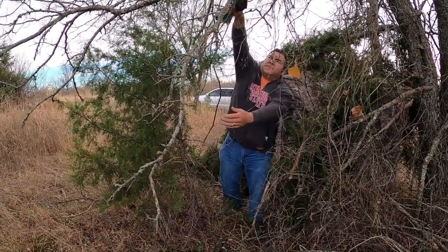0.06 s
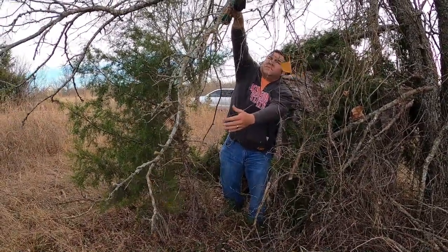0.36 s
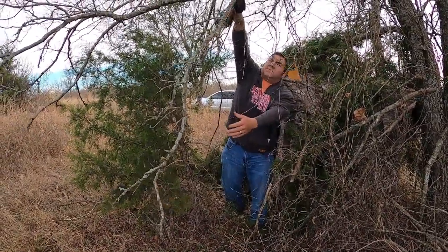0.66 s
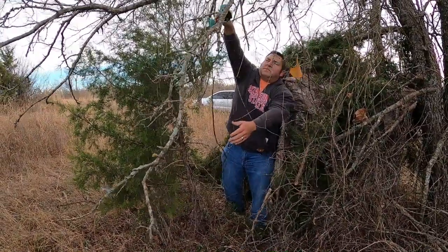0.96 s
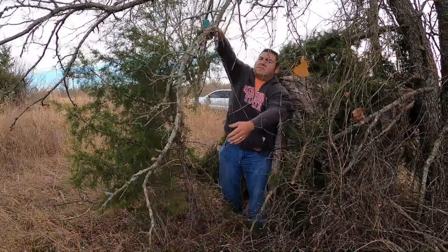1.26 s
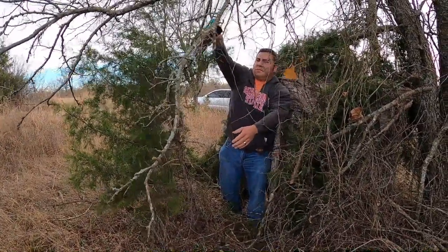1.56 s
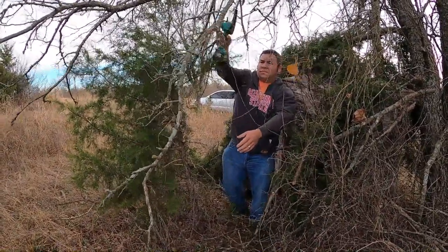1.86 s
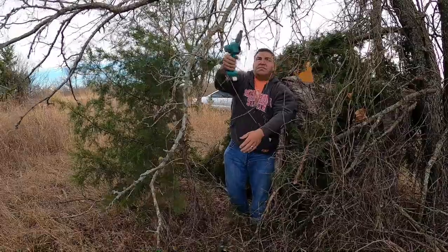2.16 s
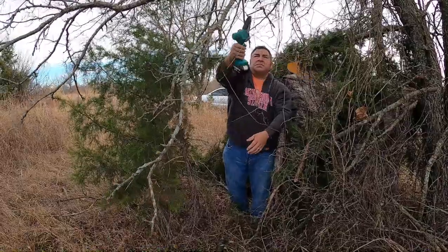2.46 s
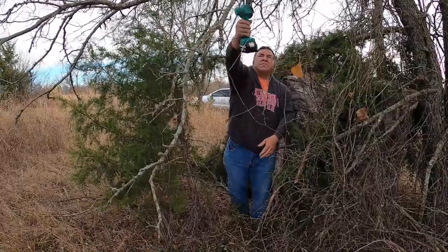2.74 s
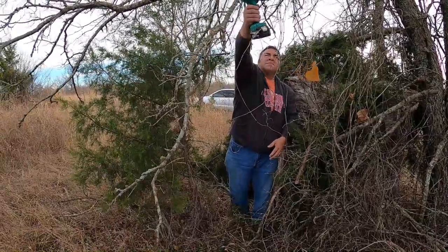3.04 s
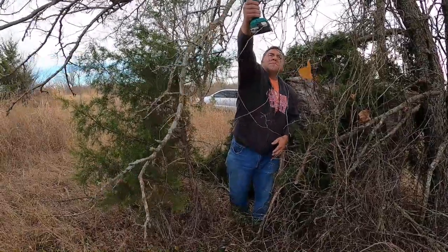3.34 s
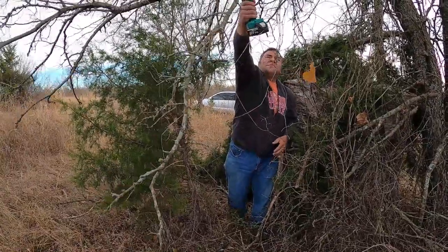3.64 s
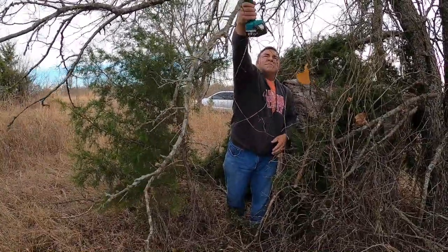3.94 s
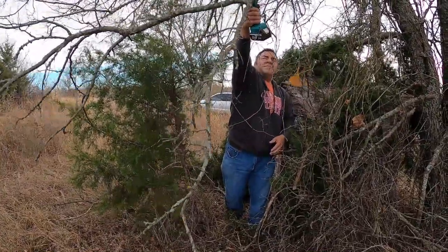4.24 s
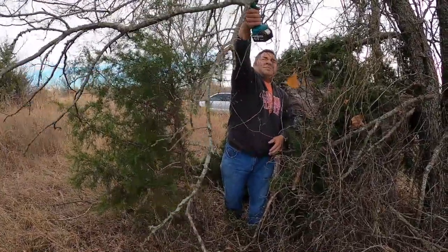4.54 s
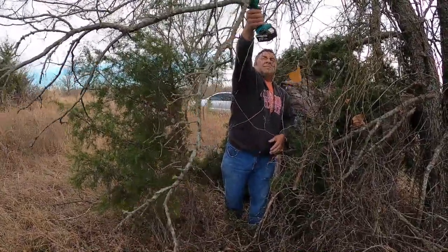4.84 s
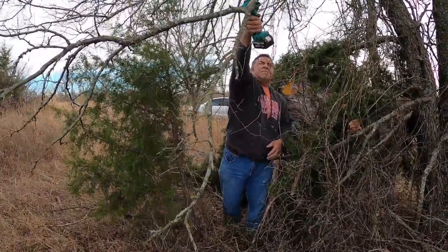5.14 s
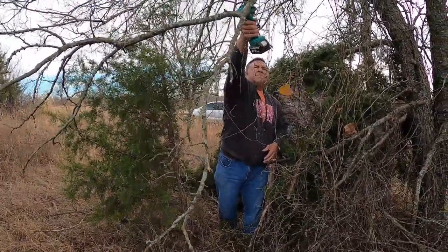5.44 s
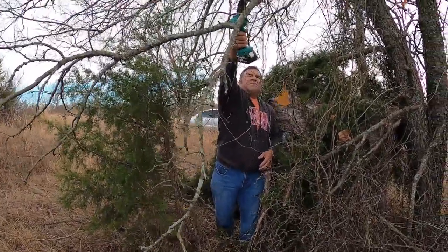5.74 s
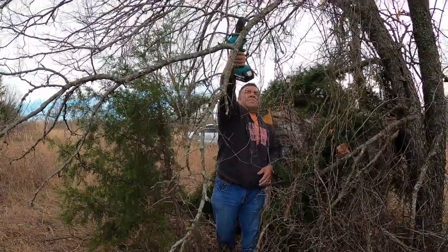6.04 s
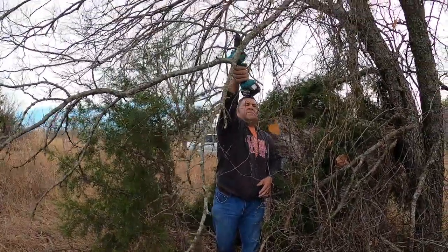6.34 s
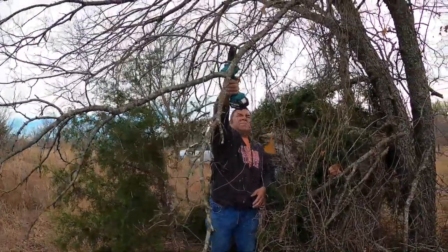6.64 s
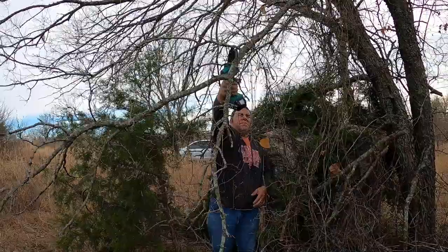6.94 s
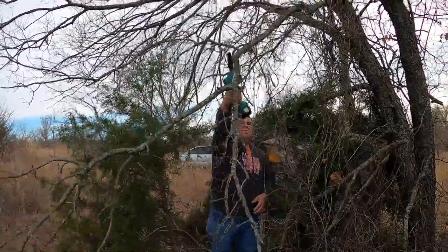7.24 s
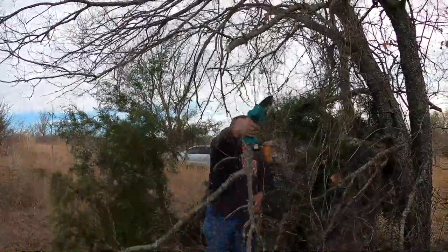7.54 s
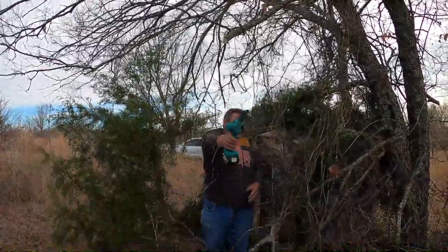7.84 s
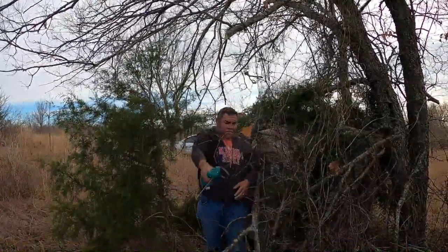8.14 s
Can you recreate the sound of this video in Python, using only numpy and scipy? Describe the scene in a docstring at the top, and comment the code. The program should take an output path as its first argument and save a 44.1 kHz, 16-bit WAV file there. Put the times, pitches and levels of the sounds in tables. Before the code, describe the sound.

A small cordless chainsaw chatters through a thin branch, coasts down, then grinds through a thick one until the wood cracks.

```python
"""Open brush, a far road behind; a few metres from the microphone a cordless mini chainsaw works overhead.
It chatters through a thin dry branch, the slack chain slapping the steel bar, and coasts to rest.
Twigs brush and snap as it is lifted again. At 4 s it bites a thick branch, jams briefly, then grinds
on, the gear whine sagging under load. The wood cracks and swishes down, and the saw coasts once more
as it is lowered towards the microphone."""
import sys
import numpy as np
from scipy import signal
from scipy.fft import rfft, irfft, next_fast_len
from scipy.io import wavfile
from scipy.ndimage import map_coordinates

SR = 44100
rng = np.random.default_rng(int(sys.argv[2]) if len(sys.argv) > 2 else 0)


def log_audio(samples):
    """Write samples as a 16-bit WAV file to the path given in sys.argv[1]."""
    # one column per channel
    frames = np.atleast_2d(samples).T
    # limit to full scale, then quantise
    limited = np.clip(frames, -1, 1)
    pcm = np.round(limited * 32767).astype(np.int16)
    wavfile.write(sys.argv[1], SR, pcm)


N = 361179

# The two cuts. Each row: trigger pulled, wood cut through and trigger released in seconds,
# base shaft speed in the wood in Hz, then base levels in dB of chain, bite, growl, whine and rasp.
CUTS = [(-.5, .785, 1.03, 346, -29.5, -29.5, -46.3, -40, -46),
        (3.978, 7.331, 7.46, 316.1, -28.7, -27.3, -51, -32, -34.7)]
# The chain binds and the motor bogs down. Each row: time in seconds, speed lost in Hz, half-width in seconds.
BOGS = [(.13, 14, .09), (.7, 16, .1), (4.228, 104, .021), (4.275, 62, .045), (4.97, 50, .07),
        (5.29, 22, .045), (5.48, 73, .055), (5.68, 24, .05), (5.93, 20, .04), (6.055, 104, .065),
        (6.18, 30, .05), (6.53, 22, .035), (6.79, 25, .06), (6.9, 27, .11)]
# The spectrum of a sharp impact. Each row: frequency in Hz, level in dB.
IMPACT_SPECTRUM = [(100, -33), (400, 0), (1000, -4.5), (2500, 2), (4000, 1), (6800, 2), (8000, 1.5),
                   (9500, -12.5), (13000, -8), (15700, -36)]
CUTTERS_PER_TURN = .5  # a cutter meets the wood every second turn of the shaft
JAM_AT_S = 4.232


def amp(db):
    return 10 ** (np.asarray(db) / 20)


def unit(x):
    return x / np.sqrt(np.mean(x ** 2) + 1e-20)


def clock():
    return np.arange(N) / SR


def since(s):
    """Seconds gone by since s, zero before it."""
    return np.maximum(clock() - s, 0)


def along(points, hz):
    """Read (Hz, value) points on a log frequency axis."""
    knots, values = np.transpose(points)
    return np.interp(np.log(hz + 1), np.log(knots + 1), values)


def envelope(start, end, attack_s, release_s):
    """Rises from start, holds, and dies away after end."""
    return (1 - np.exp(-since(start) / attack_s)) * np.exp(-since(end) / release_s)


def swells(rows):
    """Sum of peaks that build and die away, from (s, height, half-width s) rows."""
    return sum(height * np.exp(-np.abs(clock() - s) / width) for s, height, width in rows)


def hump(s, db, width_s):
    """A gain that swells smoothly to db at s and fades again."""
    return amp(db) * np.exp(-((clock() - s) / width_s) ** 2)


def wobble(rate):
    """A smooth random curve, rate knots a second."""
    return map_coordinates(rng.standard_normal(int(N * rate / SR) + 4), [np.arange(N) * rate / SR])


def grains(rate, spread_db):
    """Tiny impacts at random times and of scattered size; rms 1."""
    impacts = (rng.random(N) < rate / SR) * rng.standard_normal(N)
    return unit(impacts * amp(spread_db * rng.standard_normal(N)))


def strokes(turns, spread_db, decay):
    """One fading stroke of random force for each whole turn."""
    force = amp(spread_db * np.clip(rng.standard_normal(N), -2, 2))
    return unit(force[turns.astype(int)] * np.exp(-(turns % 1) / decay))


def filtered(x, response):
    """x times a complex response of frequency."""
    size = next_fast_len(N + SR // 4)
    return irfft(rfft(x, size) * response(np.fft.rfftfreq(size, 1 / SR)), size)[..., :N]


def coloured(x, gain_db, size=4096):
    """x through a causal filter whose gain in dB is a function of frequency."""
    cepstrum = irfft(np.log(amp(gain_db(np.fft.rfftfreq(size, 1 / SR))) + 1e-6))
    cepstrum[1:size // 2] *= 2
    cepstrum[size // 2 + 1:] = 0
    return signal.fftconvolve(x, irfft(np.exp(rfft(cepstrum))))[:len(x)]


def body(x, spectrum, modes=()):
    """x rings a body with this spectrum and these narrow resonances; rms 1."""
    lift = lambda hz: sum(db / (1 + ((hz - centre) / width) ** 2) for centre, width, db in modes)
    return unit(coloured(x, lambda hz: along(spectrum, hz) + lift(hz)))


def add_hit(track, s, db, hz, t60, slope_db, rise_s=.00079, colour=IMPACT_SPECTRUM, size=4096):
    """Add one impact: a dying burst of noise, its colour cut by slope_db an octave either side of hz."""
    t = np.arange(size) / SR
    fade = amp(-60 * t / max(t60, .002)) * (1 - np.exp(-t / rise_s))
    gain_db = lambda f: along(colour, f) - slope_db * np.abs(np.log2((f + 50) / hz))
    hit = coloured(rng.standard_normal(size) * fade, gain_db)
    hit *= amp(db - 3) * np.linalg.norm(fade) / np.linalg.norm(hit)  # 3 dB allowed for the crest
    start = max(round(s * SR), 0)
    track[start:start + size] += hit[:N - start]


def on_first():
    """True until the trigger is pulled for the second branch."""
    return clock() < CUTS[1][0]


def by_cut():
    """The columns of CUTS, sample by sample, for the branch in hand."""
    return [np.where(on_first(), first, second) for first, second in zip(*CUTS)]


def strain_db():
    """Extra loudness of the labouring saw while the chain binds, 3 dB at most."""
    return 3 * np.tanh(swells(BOGS) / 55)


def drive():
    """Trigger and wood set the shaft speed in Hz, the load on the cutters (0-1) and the saw's gain."""
    # After each cut the saw is lowered towards the microphone. Each row: time in seconds, gain in dB.
    swing = [(.95, 0.5), (1.2, 2.5), (1.85, 3), (2.4, 0.5), (7.5, -1), (7.78, 4.5), (8.0, 5.5), (8.19, 8.5)]
    # The level dips briefly. Each row: time in seconds, change in dB, half-width in seconds.
    lulls = [(.225, -10, 0.013), (.8, -5.5, 0.049), (.972, -6.5, 0.033), (7.495, -6.5, 0.014)]
    free_hz, friction_hz, sag_hz_per_s = 420, 200, 3.5
    spin_up_s, coast_s = .045, 1.3
    start, through, release, wood_hz, *_ = by_cut()
    load = envelope(start, through, attack_s=.028, release_s=.035)
    feed = envelope(start, through, attack_s=.14, release_s=.065)
    drag = (free_hz - wood_hz + sag_hz_per_s * since(start)) * feed  # grows as the kerf deepens
    spin_up = 1 - np.exp(-since(start) / spin_up_s)
    # Once released the speed decays, and dry friction brings it to a stop.
    coast = np.maximum((free_hz + friction_hz) * np.exp(-since(release) / coast_s) - friction_hz, 0)
    coast /= free_hz
    waver = 1 + .017 * load * wobble(25)
    speed = (free_hz - drag - swells(BOGS)) * spin_up * coast * waver
    switch_on = np.clip(since(start) / .0011, 0, 1)
    swing_db = np.interp(clock(), *np.transpose(swing))
    return speed, load, switch_on * coast ** 1.435 * amp(swing_db + swells(lulls))


def chain(turns, speed, load):
    """Links rattle over the sprocket and in the bar groove, more densely at speed; wood damps the bar."""
    # The steel as the saw is held for each cut. Each row: frequency in Hz, level in dB.
    steel_first = [(60, -28), (310, -12), (385, -16), (500, -10), (680, -10), (850, -3.5), (1600, -4),
                   (1900, -2), (2500, 0), (4300, -3), (5300, -2.5), (8300, -7.5), (9500, -18.5),
                   (12500, -20), (15700, -30)]
    steel_second = [(60, -43), (320, -15), (450, -10.5), (580, -9), (780, -4.5), (920, 0.5), (1300, -5),
                    (2400, -5.5), (3300, 0), (4400, -6), (5000, -3.5), (7300, -5.5), (9800, -19.5),
                    (12500, -19), (15700, -35)]
    # The bar's resonances in the wood, ringing free, and dull as it swings down after the second cut.
    # Each row: centre in Hz, width in Hz, lift in dB.
    bar_in_wood = [(470, 30, 4), (1870, 90, 6), (2520, 90, 6), (3150, 130, 2.5), (5000, 170, 2.5),
                   (8400, 200, 3)]
    bar_free = [(490, 25, 8.5), (940, 62, 0), (1815, 91, 5), (2510, 110, 6.5), (3180, 80, 5),
                (5180, 200, 2), (8330, 290, 5)]
    bar_muted = [(903, 25, 3.5), (1000, 55, -1), (1900, 240, 5), (2500, 380, 5.5), (4800, 300, 5.5),
                 (8500, 400, 7)]
    links = strokes(turns * CUTTERS_PER_TURN + .15 * wobble(60) + 1, spread_db=1.44, decay=5.8)
    rattle = links * (grains(2500 + 22 * speed, spread_db=0) + 1.02 * rng.standard_normal(N))

    def steel(modes):
        return np.where(on_first(), body(rattle, steel_first, modes), body(rattle, steel_second, modes))

    ringing = np.where(on_first(), 1, np.clip((215 - speed) / 30, 0, 1))  # opens up below 215 Hz
    in_air = ringing * steel(bar_free) + (1 - ringing) * steel(bar_muted)
    return load * steel(bar_in_wood) + (1 - load) * in_air


def chain_lash(peak_db=5, peak_s=.075):
    """Gain of the slack chain as it lashes on speeding up: at the start and on breaking through."""
    start, through, _, _, chain_db, *_ = by_cut()
    lash = sum(age * np.exp(1 - age) for age in (since(start) / peak_s, since(through) / peak_s))
    return amp(chain_db + peak_db * lash)


def cutting(turns, load, running):
    """Each cutter strikes and tugs the branch and tears a burst of fibres; the thin branch chatters."""
    # Tearing fibres in each branch, and wood under a cutter's blow. Each row: frequency in Hz, level in dB.
    thin_wood = [(60, -24), (110, -11), (175, 2), (240, -6), (320, -6.5), (385, -18), (620, 1), (850, -5),
                 (1000, 4), (1250, 1.5), (1430, -5.5), (2500, 0.5), (3100, 0.5), (3900, 1), (4500, -8),
                 (7000, -6.5), (9500, -34), (15700, -36)]
    thick_wood = [(60, -35), (140, -14.5), (220, -8), (260, -14), (328, -10), (380, -22), (465, -8),
                  (525, -16), (600, -2.5), (800, -3.5), (910, -1), (1250, -6), (1800, -7), (3100, -3),
                  (4400, -9.5), (6800, -13), (8500, -25.5), (12000, -33.5), (15700, -58)]
    struck_wood = [(100, -22), (300, -15), (380, -20), (460, -7), (520, -10), (590, 0), (760, 0), (830, -3),
                   (910, 2), (1050, -1), (1300, -9), (2000, -14), (4000, -30)]
    # The branch rings under the cutters. Each row: centre in Hz, width in Hz, lift in dB.
    branch_modes = [(912, 26, 3.5)]
    # Pressure on the saw changes the rasp. Each row: time in seconds, change in dB, half-width in seconds.
    digs = [(6.8, 7.5, 0.16), (7.2, 3, .04), (7.32, -3, 0.027)]
    kerf_db_per_s = 1.29  # the bite grows louder as the kerf deepens
    start, through, *_, bite_db, growl_db, _, rasp_db = by_cut()
    cutters = turns * CUTTERS_PER_TURN + .024 * wobble(70) + 1
    chatter = strokes(cutters, spread_db=3, decay=.6) * amp(1.7 * wobble(36.7))
    chatter *= grains(12000, spread_db=.4)
    grind = strokes(cutters, spread_db=2, decay=1.2) * grains(14000, spread_db=.4)
    fibres = np.where(on_first(), body(chatter, thin_wood), body(grind, thick_wood, branch_modes))
    bite = amp(bite_db + kerf_db_per_s * since(start)) * fibres
    tug = np.sin(2 * np.pi * cutters) + .46 * np.sin(4 * np.pi * cutters)
    loose_db = swells([(through, 12, .3)])  # the branch shakes harder just before it parts
    growl = load * amp(growl_db + loose_db + strain_db() + 2.5 * wobble(30)) * tug
    force = load * amp(2 * rng.standard_normal(N) + 1.5 * wobble(14))
    blows = np.diff(np.floor(cutters), prepend=1) * force
    rasp = amp(rasp_db + swells(digs)) * body(blows, struck_wood, branch_modes)
    rasp *= np.sqrt(np.mean(load ** 2))
    return running * load * (growl + rasp + bite)


def gear_whine(turns, speed, load):
    """The twelve-tooth mesh whines through the gearcase; biting cutters jolt it and roughen the tone."""
    # Tones of the drive. Each row: multiple of the shaft speed, level in dB.
    gear_tones = [(10, -9), (11, -10), (12, 0), (15, -6), (24, -3)]
    # How well the gearcase radiates. Each row: frequency in Hz, gain in dB.
    gearcase = [(1500, -16), (2100, -8), (2400, -1), (3000, -.5), (3700, 0), (4100, -4), (4550, -9),
                (5050, -3), (5600, -9), (7200, -9), (8500, -22)]
    # The whine flares or dips as the chain bites.
    # Each row: time in seconds, change in dB, half-width in seconds.
    flares = [(4.16, 3, .03), (4.21, -3, .02), (4.36, 1.5, .04), (4.52, 1.5, .1), (4.96, 2.5, .04),
              (5.22, 1.5, .05), (5.47, 6, .045), (5.95, 4, .03), (6.055, -1.5, .02), (6.15, 3.5, .05),
              (6.51, 2.5, .03), (6.68, 2, .025), (7.18, 1, .1)]
    # The teeth rattle most when cutting fast or jammed; bogged down or coasting they sing more clearly.
    jolt = .35 + load * np.clip((speed - 205) / 140, .25, .72) + 1.6 * hump(JAM_AT_S, db=0, width_s=.04)
    angle = 2 * np.pi * turns + jolt * (.14 * wobble(105) + .045 * wobble(650))
    teeth = sum(amp(db + along(gearcase, k * speed)) * np.sin(k * angle) for k, db in gear_tones)
    whine = np.sqrt(2) * unit(amp(3 * wobble(300))) * teeth
    *_, whine_db, _ = by_cut()
    idle_db = -6.5 * (1 - load)
    flare_db = strain_db() + swells(flares) + 1.6 * wobble(22)
    pulse = 1 + .5 * load * np.sin(2 * np.pi * turns)  # once a turn
    return amp(whine_db + idle_db + flare_db) * pulse * whine


def shaft_hum(turns, speed, load):
    """Low orders of the motor shaft sound through the housing, steadier out of the wood."""
    # Tones of the motor. Each row: multiple of the shaft speed, level in dB.
    orders = [(2, -13.5), (3, -13), (4, -26), (6, -15)]
    # How well the housing radiates. Each row: frequency in Hz, gain in dB.
    housing = [(300, -38), (420, -17), (520, 2), (620, 1.5), (720, 1.5), (850, 3.5), (1100, -3),
               (2500, -16)]
    shake = .4 + .6 * load
    hum = np.zeros(N)
    for k, db in orders:
        gain = amp(db + along(housing, k * speed) + 5 * shake * wobble(60))
        hum += gain * np.sin(2 * np.pi * k * turns + shake ** 2 * wobble(70))
    level_db = np.where(on_first(), -40, -33) + 1.5 * (1 - load)
    return amp(level_db) * np.minimum(speed / 200, 1) * hum  # fades faster than the rattle below 200 Hz


def far_road():
    """Far traffic with an engine drone, nearly mono, and a faint wide hiss of air."""
    # The road's rumble. Each row: frequency in Hz, level in dB.
    rumble = [(12, -34), (25, -9.5), (48, 1), (100, -8), (165, -11), (230, -18), (300, -21.5), (420, -36),
              (900, -55), (2000, -93)]
    # A far engine's tones. Each row: frequency in Hz, level in dB.
    engine_tones = [(48, -66), (140, -58)]
    # Vehicles go by and the engine swells. Each row: time in seconds, rise in dB, half-width in seconds.
    passes = [(2.3, 6, 0.64), (2.85, 4, 0.2), (3.7, 7, 0.61), (5.8, 4, 0.34), (7.6, 3, 1)]
    engine_swells = [(3.6, 15.5, 0.4), (8.19, 9, 0.17)]
    noise_pair = lambda spectrum: np.array([body(rng.standard_normal(N), spectrum) for _ in range(2)])
    mid, side = noise_pair(rumble)
    road = amp(-51 + swells(passes) + 1.9 * wobble(7)) * (mid + amp(-35) * np.array([side, -side]))
    drone = sum(amp(db + 4.5 * wobble(6.3)) * np.sin(2 * np.pi * hz * clock() + wobble(5.8))
                for hz, db in engine_tones)
    air = amp(-57) * noise_pair([(100, 9), (700, -10), (3000, -3), (7000, -7), (15000, -27)])
    return road + amp(swells(engine_swells)) * drone + air


def chain_knocks():
    """The chain snags and clacks on the bar; now and then a link pings on its nose."""
    # Clacks and pings. Each row: start in seconds, level in dB, centre in Hz.
    clacks = [(0.017, -11, 2530), (0.025, -6, 3070), (0.082, -7.5, 3140), (0.085, -9, 3400),
              (.123, -6.5, 3000), (.144, -8, 2800), (.166, -6, 3000), (0.19, -6, 2600), (.201, -10.5, 2970),
              (.205, -6, 3000), (.243, -10, 3000), (.3, -8.5, 3130), (.318, -9.5, 3040), (.324, -6.5, 3000),
              (.357, -10, 2100), (.372, -7, 3500), (.449, -5, 2200), (0.499, -8, 3000), (.534, -6, 4000),
              (.583, -6, 3060), (.611, -8.5, 3690), (.672, -5.5, 2600), (0.699, -5, 3890),
              (.726, -14, 2200), (0.765, -8, 3060), (0.769, -11, 3000), (.816, -8, 2430), (.859, -8, 2330),
              (0.888, -10, 2800), (.914, -7.5, 2500), (0.938, -4, 2490), (0.995, -9, 1700),
              (1.091, -9, 2300), (1.158, -10.5, 1800), (1.235, -12.5, 2600), (1.396, -11.5, 2490),
              (1.404, -26, 2400), (1.433, -15, 2620), (1.463, -14, 2000), (1.487, -13, 2310),
              (1.493, -15, 2400), (1.536, -17.5, 1860), (1.582, -27, 2200), (1.701, -22.5, 2080),
              (1.708, -21, 2100), (1.748, -17.5, 1990), (1.809, -18.5, 2020), (1.845, -18.5, 2060),
              (1.891, -24, 1800)]
    pings = [(1.183, -12, 6000), (1.208, -7.5, 6000), (1.249, -15, 6200), (7.563, -9, 7000),
             (7.618, -12, 5500)]
    # Steel striking steel. Each row: frequency in Hz, level in dB.
    steel_on_steel = [(100, -38), (500, -21), (950, 6), (1400, 0.5), (1900, 4), (2500, 3.5), (4000, 3.5),
                      (6800, 2), (7900, -13), (9500, -17), (13000, -25), (15700, -24)]
    track = np.zeros(N)
    for s, db, hz in clacks:
        add_hit(track, s, db, hz, t60=.009, slope_db=5, rise_s=.00025, colour=steel_on_steel)
    for s, db, hz in pings:
        add_hit(track, s, db, hz, t60=.009, slope_db=10, rise_s=.00025)
    return track


def chain_slaps(count=64, per_s=20):
    """Shaken by the thin branch, the chain slaps the bar lightly at uneven intervals."""
    track = np.zeros(N)
    times = np.cumsum(rng.uniform(.3, 1.7, count)) / per_s
    for s, (force, pitch) in zip(times, rng.standard_normal((count, 2))):
        over_chain_db = 8.5 + 4.5 * force
        hz = 2600 * 2 ** (.22 * pitch)
        add_hit(track, min(s, CUTS[1][0]), over_chain_db, hz, t60=.018, slope_db=3, rise_s=.00029)
    return track * on_first()


def twigs():
    """Dry twigs brush softly, in little clumps, and crackle against each other."""
    # Scraping twigs. Each row: frequency in Hz, level in dB.
    twig_spectrum = [(300, -23), (900, -13), (1200, -4.5), (1650, -5.5), (2800, -1.5), (4200, -5.5),
                     (7000, -9.5), (9500, -16.5), (12000, -27), (15700, -38)]
    # Saw and sleeve sweep through them, or pause.
    # Each row: time in seconds, change in dB, half-width in seconds.
    sweeps = [(2.04, 15, .041), (2.23, 19, 0.26), (2.47, -12, 0.064), (2.85, 16.5, 0.23), (3.12, 7.5, 0.11),
              (3.36, 7, 0.026), (3.6, 5, 0.028), (3.74, 14, 0.2)]
    scratch = grains(1200, spread_db=3) + .7 * rng.standard_normal(N) + .55 * grains(110, spread_db=2)
    clumps = amp(2.2 * wobble(55))
    return amp(-66 + swells(sweeps)) * body(scratch * clumps, twig_spectrum)


def wood_knocks():
    """Branches thud together and twigs snap between the cuts; then the thick branch cracks."""
    # Cracks. Each row: start in seconds, level in dB, centre in Hz.
    cracks = [(4.013, -9, 2600), (4.237, -7, 2480), (7.239, -8, 1100), (7.451, -2.5, 2200),
              (7.466, -11, 3700)]
    # Thuds and snaps. Each row: start in seconds, level in dB, centre in Hz, seconds to fall 60 dB.
    thuds = [(2.091, -31, 900, 0.023), (2.2, -47, 800, .04), (2.232, -36.5, 650, .04),
             (3.1, -43, 900, 0.036), (3.679, -30, 644, 0.021), (3.683, -33.5, 380, 0.087),
             (3.755, -46, 600, 0.025), (3.897, -39.5, 600, .03)]
    snaps = [(2.091, -29, 2930, 0.015), (2.197, -33, 3000, 0.065), (2.231, -21, 4000, 0.0097),
             (2.358, -34, 3500, .015), (2.547, -28.5, 2870, 0.015), (2.608, -40, 1830, .015),
             (2.668, -35, 4560, 0.043), (2.756, -39, 5800, .07), (2.795, -43, 2730, .04),
             (2.81, -36, 2300, 0.045), (2.837, -42, 2430, .03), (2.865, -41, 2800, .02),
             (2.921, -36, 2860, 0.037), (3.05, -37, 2820, .015), (3.1, -37, 2650, 0.041),
             (3.168, -39, 2800, 0.025), (3.523, -30.5, 2640, 0.055), (3.544, -32, 3100, .03),
             (3.682, -18.5, 1940, 0.028), (3.722, -34, 2600, 0.013), (3.873, -39, 2760, 0.043)]
    track = np.zeros(N)
    for s, db, hz in cracks:
        add_hit(track, s, db, hz, t60=.015, slope_db=16.5, rise_s=.00066)
    for s, db, hz, t60 in thuds:
        add_hit(track, s, db, hz, t60, slope_db=6.5)
    for s, db, hz, t60 in snaps:
        add_hit(track, s, db, hz, t60, slope_db=6.5, rise_s=.001)
    return track


def ripping(turns):
    """The cutters crunch through fibres as they jam, and again, lower, as the thick branch parts."""
    # The jam's crunch and the last fibres' tear. Each row: frequency in Hz, level in dB.
    crunch_spectrum = [(300, -27), (1000, -6), (1900, -6), (2350, 1), (2700, -4), (3300, -5), (4500, -16),
                       (15000, -50)]
    tear_spectrum = [(100, -16), (160, -6), (330, -1), (500, -3), (660, 5), (900, -7), (1500, -22),
                     (4000, -42)]
    rips = strokes(turns * CUTTERS_PER_TURN + 1, spread_db=3, decay=.6) * grains(9000, spread_db=2)
    crunch = hump(JAM_AT_S, db=-23.5, width_s=.032) * body(rips, crunch_spectrum)
    tear = hump(7.315, db=-31, width_s=.035) * body(rips, tear_spectrum)
    return crunch + tear


def fall_and_lowering():
    """The branch swishes down, the slowing chain rubs the bar until it sings, and a low bump follows."""
    # Swishing brush, singing bar and soft bump. Each row: frequency in Hz, level in dB.
    swish_spectrum = [(600, -17), (1800, -6), (4000, 0), (5800, -5), (7500, -2), (9500, -21), (15000, -30)]
    sing_spectrum = [(1500, -38), (2250, -11), (2520, -2), (2650, -5), (2950, -18), (4500, -34)]
    bump_spectrum = [(20, -15), (60, 3), (110, -7), (200, -22), (500, -60)]
    sweep, rub, push = rng.standard_normal((3, N))
    swish = hump(7.79, db=-27.5, width_s=.036) * body(sweep + grains(2000, spread_db=2), swish_spectrum)
    sing = hump(8.14, db=-36, width_s=.086) * body(rub, sing_spectrum)
    bump = hump(8.18, db=-39, width_s=.035) * body(push, bump_spectrum)
    return swish + sing + bump


def brush_echo(x, size=4096):
    """Trunks and brush return a short diffuse answer that keeps changing as the saw moves."""
    # Decay among the trees. Each row: frequency in Hz, seconds to fall 60 dB.
    decay_times = [(200, 0.11), (2000, 0.2), (10000, 0.035)]
    starts = range(0, N, size)
    hz, t, noise = signal.stft(rng.standard_normal((len(starts), 2, 2 * size)), SR, nperseg=256)
    tails = signal.istft(noise * amp(-60 * t / along(decay_times, hz)[:, None]), SR, nperseg=256)[1]
    answer = np.zeros((2, N + 4 * size))
    for start, tail in zip(starts, tails):
        echo = signal.fftconvolve(x[None, start:start + size], tail / np.linalg.norm(tail[0]), axes=1)
        answer[:, start:start + echo.shape[1]] += echo
    # Thin branches throw back treble better than bass.
    return filtered(answer[:, :N], lambda f: amp(along([(300, -4), (2000, -1), (5000, 2), (9000, 7)], f)))


def microphone(x):
    """The two microphone ports hear the saw with a small lag and imbalance."""
    # Imbalance of the ports. Each row: frequency in Hz, left over right in dB.
    balance = [(200, .4), (380, -2.5), (700, -.5), (1290, -2.5), (2400, .3), (7500, 1), (9000, -7),
               (12000, -3), (15000, -2)]
    # Lag between them. Each row: frequency in Hz, lead of the left in radians.
    lead = [(50, 0), (400, -.25), (600, .1), (900, -.55), (1200, -.2), (2600, -.7), (6000, -1.2),
            (7000, -2), (7900, -3.1), (9000, -1.6), (12000, -.8), (15000, -2.6)]
    sides = np.array([[.5], [-.5]])
    return filtered(x, lambda hz: amp(sides * along(balance, hz)) * np.exp(1j * sides * along(lead, hz)))


def scene():
    """Saw and wood a few metres off, their answer from the brush, and the far road."""
    speed, load, running = drive()
    turns = np.cumsum(speed) / SR
    rattle = running * chain_lash() * (chain(turns, speed, load) + chain_slaps())
    sawing = cutting(turns, load, running) + ripping(turns) + fall_and_lowering()
    motor = running * (gear_whine(turns, speed, load) + shaft_hum(turns, speed, load))
    near = rattle + sawing + motor + chain_knocks() + wood_knocks() + twigs()
    return microphone(near) + amp(-12) * brush_echo(near) + far_road()


def record(dry, top_hz=15700):
    """The recorder keeps nothing above its band limit."""
    return filtered(dry, lambda hz: hz < top_hz)


dry = scene()
out = record(dry)
log_audio(out)
```